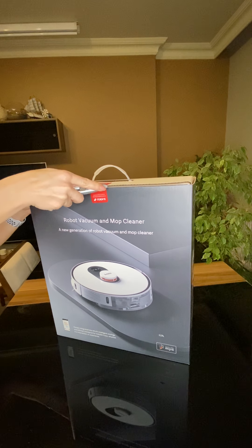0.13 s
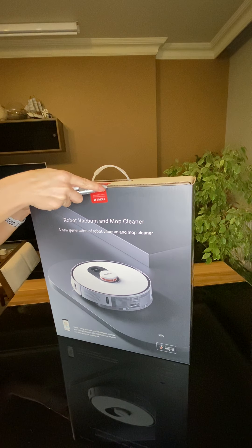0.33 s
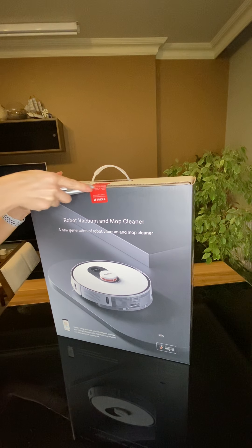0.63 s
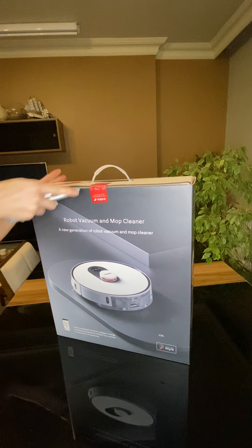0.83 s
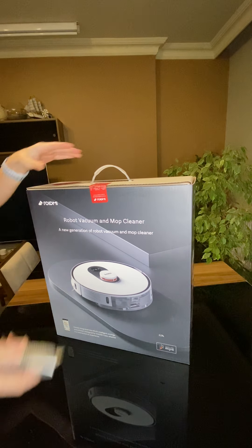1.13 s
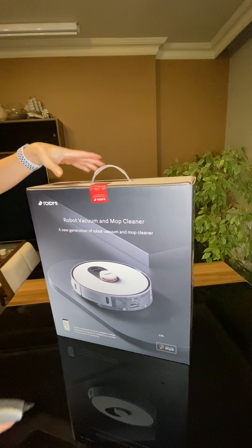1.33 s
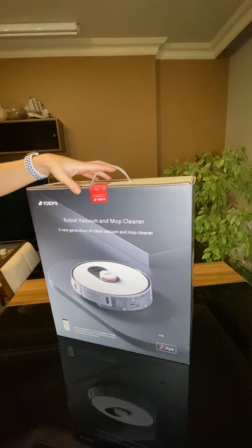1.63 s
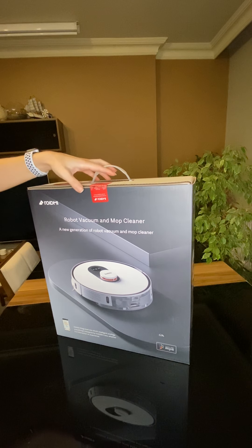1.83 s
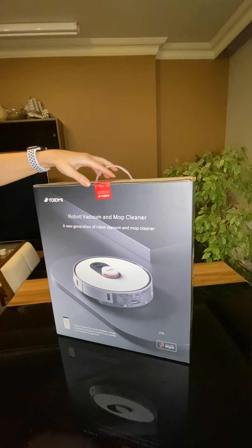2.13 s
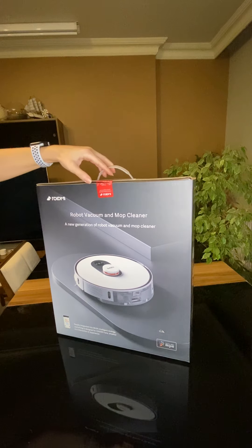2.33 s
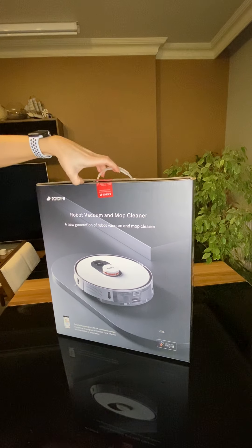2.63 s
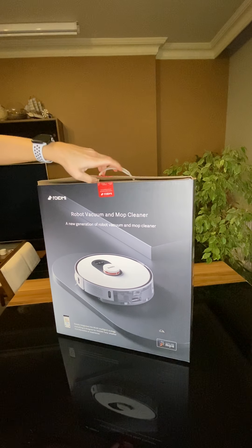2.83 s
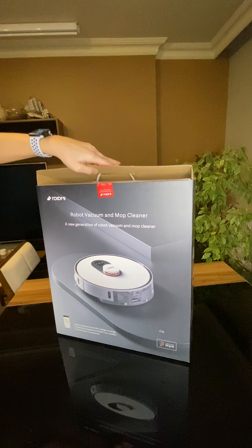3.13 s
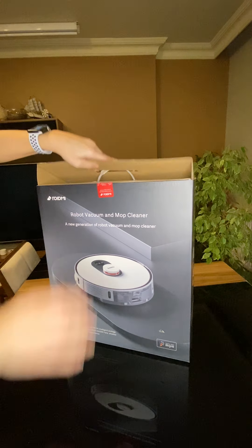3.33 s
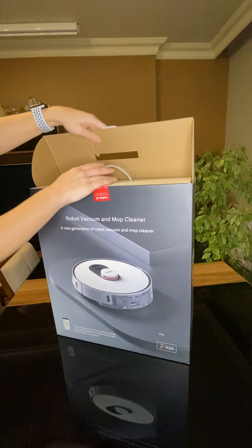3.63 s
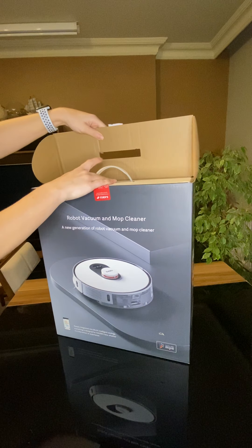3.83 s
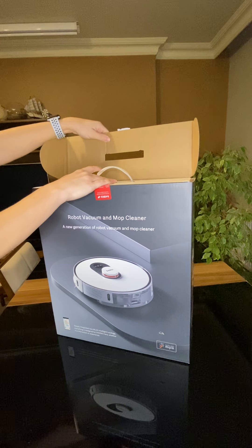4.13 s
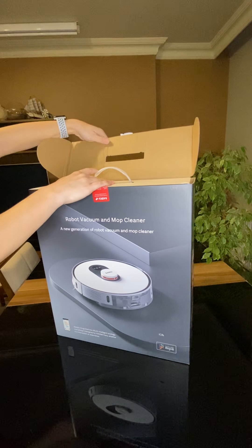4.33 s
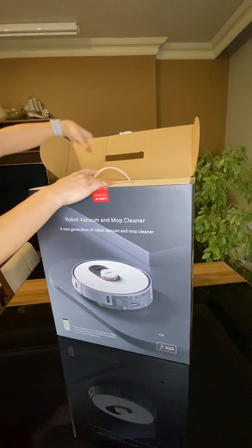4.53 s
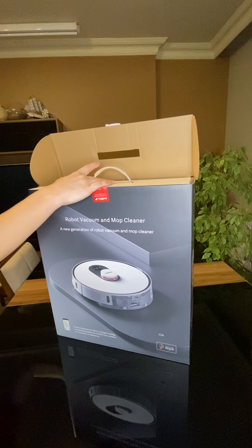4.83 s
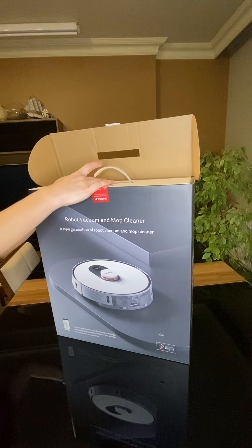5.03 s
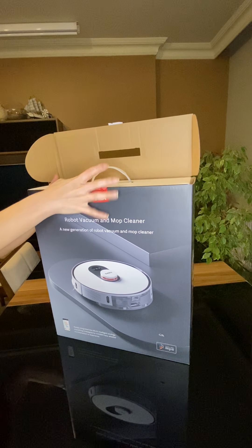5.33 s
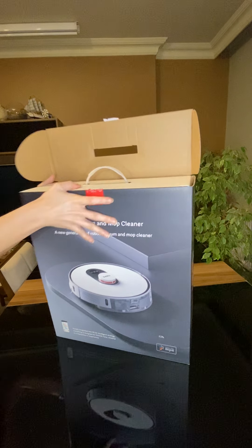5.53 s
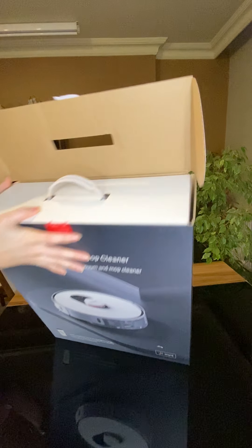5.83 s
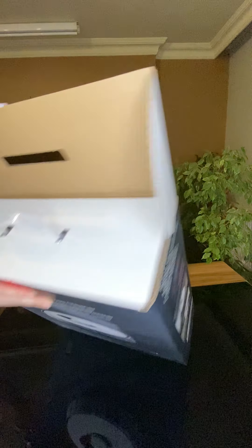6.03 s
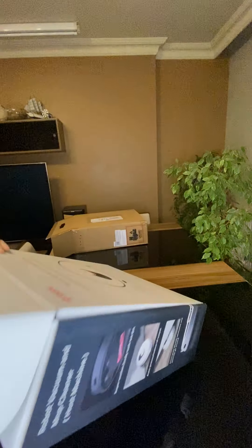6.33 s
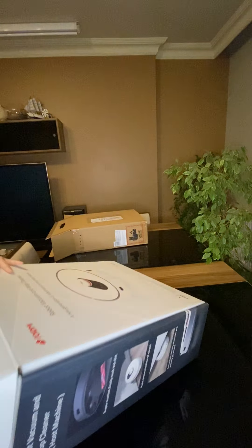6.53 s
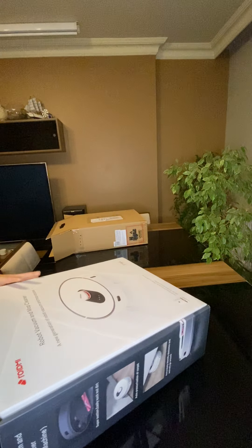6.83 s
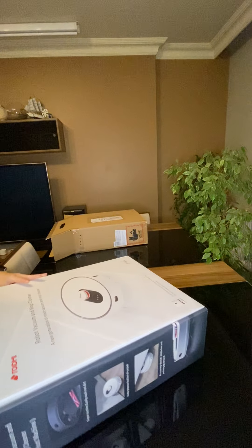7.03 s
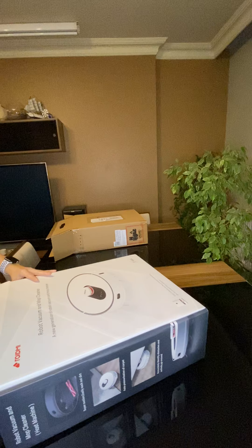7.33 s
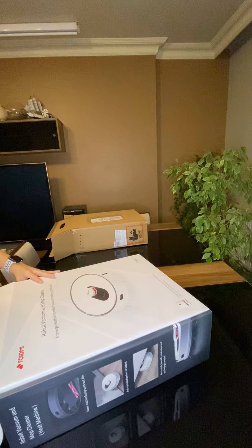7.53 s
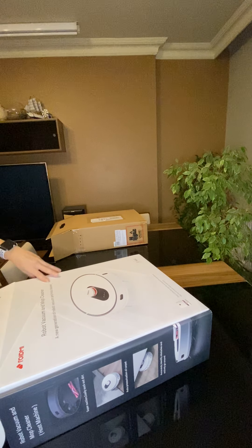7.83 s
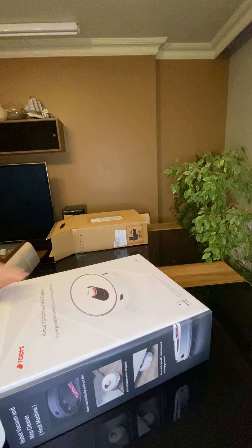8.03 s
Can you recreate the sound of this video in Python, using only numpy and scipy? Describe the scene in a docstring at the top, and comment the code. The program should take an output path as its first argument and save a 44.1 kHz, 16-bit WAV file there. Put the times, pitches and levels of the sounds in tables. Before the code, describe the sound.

A cardboard box is cut and pulled open with rasps, sharp snaps and hollow knocks, then rubs and slides on a table.

```python
"""In a quiet room, a large cardboard box rests on a hard table whose top rumbles under the load.
Hands cut the seal: stick-slip friction makes the card rasp, knocks ring the hollow box, fibres snap.
The plastic handle then ticks in its slot, and the box is pulled open with the loudest knocks and snaps.
Last, the flaps creak and slide as they are folded, and the box is laid down.
Sound and room echo reach a nearby phone with two microphone ports."""
import sys
import numpy as np
from scipy import signal
from scipy.fft import rfft, irfft
from scipy.io import wavfile
from scipy.ndimage import uniform_filter1d

SR = 44100
rng = np.random.default_rng(int(sys.argv[2]) if len(sys.argv) > 2 else 0)


def wav_record(signal):
    """Record a signal, one row per channel, as 16-bit PCM in the file named by sys.argv[1]."""
    frames = np.transpose(np.atleast_2d(signal))
    bounded = np.clip(frames, -1, 1)
    # unit amplitude maps onto the largest positive 16-bit level
    quanta = np.round(bounded * 32767).astype(np.int16)
    wavfile.write(sys.argv[1], SR, quanta)


N = 360738

# blows on the box: (time [s], panel level [dB], panel pitch [Hz], boom level [dB], crunch level [dB])
KNOCKS = [(0.496, -19.5, 446, -64, -33.5), (0.528, -14.5, 290, -24, -48), (0.68, -23, 432, -30.5, -34),
          (0.706, -22, 442, -34.5, -60), (2.152, -38, 730, -46, -80), (2.288, -28.5, 344, -45, -42.5),
          (2.493, -18, 355, -27.5, -33), (2.889, -10.5, 754, -41, -37), (2.903, -26, 790, -55, -39),
          (2.941, -18, 753, -50, -39), (3.05, -33.5, 350, -33.5, -48), (3.395, -26.5, 730, -31.5, -28),
          (3.425, -21, 546, -28, -17.5), (3.503, -8, 780, -30, -15), (3.514, -12, 400.5, -15.5, -19),
          (3.783, -31, 680, -55, -42), (3.894, -30.5, 446, -58, -41), (3.95, -28, 295, -40.5, -36),
          (4.033, -29.5, 405, -46, -43), (4.247, -29.5, 314, -51, -40.5), (4.273, -25.5, 297, -64, -37.5),
          (4.426, -29.5, 340, -36.5, -37), (4.47, -29.5, 340, -33.5, -56), (4.683, -35, 633, -87, -32.5),
          (4.8, -17, 650, -46, -35.5), (4.816, -17, 327, -22, -28), (4.9, -26.5, 590, -38, -38.5),
          (4.911, -21, 257, -24.5, -53), (4.988, -21.5, 319, -26.5, -42), (5.008, -27, 276, -28.5, -61),
          (5.046, -33, 770, -49, -40), (5.09, -35, 814, -53, -38), (5.215, -26.5, 580, -35.5, -59),
          (5.279, -28, 576, -34.5, -41), (5.375, -30, 463, -37, -39), (5.502, -36, 446, -40.5, -36.5),
          (5.655, -32, 393, -55, -47.5), (5.693, -29, 356, -50.5, -46), (5.746, -36.5, 430, -53.5, -54.5),
          (5.829, -37, 300, -36, -64.5), (5.943, -44, 850, -47.5, -44.5), (6.043, -36.5, 730, -69.5, -49.5),
          (6.188, -35, 920, -48, -57), (6.244, -35.5, 388, -44, -50), (6.425, -30.5, 415, -53, -57),
          (6.49, -35, 560, -40.5, -76), (6.512, -30.5, 407, -47.5, -56), (6.574, -31.5, 370, -49, -73),
          (6.734, -39.5, 1020, -45, -48), (6.751, -35, 790, -43, -54), (6.821, -31, 392, -59, -52),
          (7.063, -26.5, 493, -32.5, -36.5), (7.476, -17.5, 454, -25, -30.5),
          (7.766, -27.5, 523, -44.5, -66.5), (7.806, -33, 303, -40, -52), (7.822, -25.5, 717, -53, -54),
          (7.985, -38, 318, -52, -65)]
# treble resonances of the card's skin: (frequency [Hz], bandwidth [Hz], gain [dB])
SKIN_MODES = [(5100, 1200, 2.5), (7280, 720, 8), (8900, 5400, 2.5), (13200, 1700, -1.5)]


def undb(db):
    return 10 ** (np.asarray(db) / 20)


def unit_rms(x):
    return x / np.sqrt(np.mean(x ** 2))


def unit_peak(x):
    return x / np.abs(x).max()


def add(out, start_s, piece):
    i = int(start_s * SR)
    out[i:i + len(piece)] += piece[:N - i]


def band(x, lo_hz, hi_hz):
    return signal.lfilter(*signal.butter(2, [lo_hz, hi_hz], "band", fs=SR), x)


def by_time(table):
    """Linear interpolation of each level column, silent before the first row."""
    times, *columns = np.transpose(table)
    return [np.interp(np.arange(N) / SR, times, db, left=-120.) for db in columns]


def by_frequency(table):
    """Interpolation onto the spectrum's bins along a logarithmic frequency axis."""
    hz, value = np.transpose(table)
    bin_hz = np.arange(N // 2 + 1) * SR / N
    return np.interp(np.log(bin_hz + 1), np.log(hz + 1), value)


def resonate(x, modes):
    """Modal superposition: band-pass resonances alternate in sign so that the valleys stay filled."""
    return sum((-1) ** k * undb(db) * signal.lfilter(*signal.iirpeak(hz, hz / width, SR), x)
               for k, (hz, width, db) in enumerate(modes))


def wander(rate_hz):
    """Slow modulation: straight ramps between random values."""
    hold = int(SR / rate_hz)
    return uniform_filter1d(np.repeat(rng.standard_normal(N // hold + 1), hold), hold)[:N]


def room_tone():
    """Ambient air noise: long waves reach both ports alike, the middle range differs between them."""
    spectrum = [(30, -19.5), (102, 1), (125, -6), (301, -15.5), (428, -28.5), (473, -16), (510, -24.5),
                (672, -26), (12000, -65), (15600, -97.5), (22000, -120)]  # air noise: (frequency [Hz], relative spectral density [dB])
    mid, side = (irfft(rfft(rng.standard_normal(N)) * undb(by_frequency(spectrum)), N) for _ in range(2))
    air = mid + 1.9 * band(side, 400, 5600) * np.array([[1], [-1]])
    return unit_rms(air) * undb(-57.5 + 0.75 * wander(19.0))


def table_top():
    """Forced vibration: the weight on the table and every knock shake its lowest modes."""
    load = [(0, -60), (.4, -72), (1.0, -62), (2.4, -51), (3.3, -56), (4.1, -54), (4.85, -48.5), (5.1, -47),
            (5.6, -56), (6.5, -56), (6.77, -49), (6.9, -54), (8.18, -52.5)]  # rumble under the resting weight: (time [s], level [dB])
    jolt_db, rise_s, fade_s = -25, 0.067, 0.097  # level relative to the knock's boom
    drive = resonate(rng.standard_normal(N), [(55.0, 37, 0)])
    shake = resonate(drive, [(49.0, 8.5, -3.5), (60.55, 9.1, 4.5)])
    gain, t = undb(by_time(load)[0]), np.arange(SR) / SR
    jolt = (1 - np.exp(-t / rise_s)) * np.exp(-t / fade_s)
    for start, _, _, boom_db, _ in KNOCKS:
        add(gain, start, undb(boom_db + jolt_db) * jolt)
    return unit_rms(shake) * gain


def slips(per_second, spread_db):
    """Stick-slip release: impulses at random moments, a few larger than the rest, at unit RMS."""
    out = np.zeros(N)
    when, size, sign = rng.random((int(per_second * N / SR), 3)).T
    size_db = spread_db * np.minimum(-np.log(1 - size), 3.5)
    out[(when * N).astype(int)] = undb(size_db) * np.sign(sign - .5)
    return unit_rms(out)


def slide_gains():
    """Friction noise follows pressure: creak, scrape and hiss swell together and share the hand's jerks."""
    # hands resting and shifting on the box: (time [s], creak level [dB], scrape level [dB])
    handling = [(.4, -84, -100), (.62, -63, -72), (.95, -71.5, -70), (1.25, -74, -77), (1.5, -69.5, -74.5),
                (2.26, -61.5, -71), (2.72, -80, -101), (3.0, -47.5, -57.5), (3.3, -56.5, -62.5),
                (3.7, -60, -56), (4.21, -86, -83), (4.8, -55, -71.5), (5.5, -53.5, -70.5),
                (6.0, -54.5, -74), (7.25, -62, -68.5), (7.41, -58.5, -76.5), (7.7, -58.5, -70),
                (8.0, -62.5, -69.5), (8.1, -76.5, -105)]
    # card sliding on card or table: (time of hardest push [s], length [s], creak [dB], scrape [dB],
    # hiss [dB])
    slides = [(0.524, 0.13, -47, -66, -75), (0.763, 0.23, -56, -56, -56.5), (1.63, 0.24, -66, -76, -63),
              (2.55, 0.25, -46, -54, -55.5), (2.854, 0.18, -44, -51.5, -53.5),
              (3.153, 0.11, -39.5, -65, -56), (3.59, 0.34, -50, -58, -52), (3.842, 0.52, -43, -68, -56),
              (4.068, 0.34, -46, -74, -80.5), (4.444, 0.41, -65, -68.5, -52), (4.613, 0.32, -92, -64, -53),
              (5.303, 0.36, -48.5, -61, -51), (6.23, 0.64, -57.5, -57, -58),
              (6.705, 0.42, -53.5, -60.5, -63), (7.089, 0.27, -56, -61.5, -69),
              (7.847, 0.33, -52.5, -74.5, -60.5)]
    rise_share, ends_db = 0.42, -20  # share of the length before the push; level at both ends
    hiss_offset_db, jerk_db = -7.5, [2.2, 1.7, 1.8]
    creak_db, scrape_db = by_time(handling)
    gains = undb([creak_db, scrape_db, scrape_db + hiss_offset_db])
    for push, length, *levels_db in slides:
        t = np.arange(-int(length * SR), int(2 * length * SR)) / SR
        swell = undb(ends_db * np.maximum(-t / rise_share, t / (1 - rise_share)) / length)
        for gain, db in zip(gains, levels_db):
            add(gain, push + t[0], undb(db) * swell)
    judder = wander(22) + .6 * wander(90)
    return gains * undb(np.outer(jerk_db, judder))


def rasp_gains():
    """Transient friction: a flap dragged past an edge bites at once, swells or eases, then lets go."""
    # short hard rasps: (time [s], length [s], swell [dB], flap creak [dB], scrape [dB], hiss [dB],
    # squeak [dB])
    rasps = [(0.487, 0.042, 4.5, -44.5, -49.5, -50.5, -56), (0.689, 0.06, -17, -40.5, -48, -43, -56),
             (2.178, 0.034, -2.5, -59.5, -69, -63.5, -70), (2.3, 0.051, 8, -57, -65, -63, -70),
             (2.9, 0.076, -14, -31.5, -39, -59, -62), (3.141, 0.061, -1.5, -54, -51.5, -55, -78),
             (3.403, 0.089, 11.5, -30.5, -42.5, -50, -67), (4.242, 0.2, -11, -46.5, -62, -61, -72.5),
             (4.442, 0.017, -2.5, -39, -49.5, -56, -65), (4.676, 0.035, 1.5, -44, -45, -48.5, -48.5),
             (5.049, 0.059, 3.5, -51, -64, -55.5, -63), (5.526, 0.06, 9.5, -54, -67.5, -70.5, -65.5),
             (5.838, 0.04, -7.5, -52.5, -99.5, -105.5, -66.5), (6.15, 0.13, 1, -52, -83, -94, -63),
             (6.602, 0.088, 4.5, -81, -64, -98, -52.5), (7.131, 0.056, -8.5, -50, -62, -77, -53),
             (7.442, 0.11, -6, -40, -52, -68, -53), (7.731, 0.03, -3, -46, -60, -77, -61.5),
             (7.788, 0.072, -7, -42, -52.5, -61, -62)]
    bite_s, release_s = 0.0029, 0.0097
    gains = np.zeros((4, N))
    for start, length, swell_db, *levels_db in rasps:
        t = np.arange(int((length + 0.085) * SR)) / SR
        release = np.exp(-np.maximum(t - length, 0) / release_s)
        envelope = undb(swell_db * t / length) * np.minimum(t / bite_s, 1) * release
        for gain, db in zip(gains, levels_db):
            add(gain, start, undb(db) * envelope)
    return gains


def rubbing():
    """Stick-slip friction drives resonances: walls creak, edges scrape, skin hisses, print squeaks."""
    # resonances of walls, edges and glossy print: (frequency [Hz], bandwidth [Hz], gain [dB])
    wall_modes = [(126, 170, 2.5), (179.2, 53, 8), (250, 160, -2), (430, 97, -2.5), (622, 170, -4.5),
                  (750, 140, -6), (1220, 860, -18.5)]
    edge_modes = [(1510, 720, -3), (2380, 470, 2), (2867, 576, 4), (4250, 4000, -5.5)]
    squeak_modes = [(2303, 160, 0.69), (2920, 750, -1.7)]
    wander_db, rubbing_top_hz = 4.2, 12500
    grip = slips(260, 1.2) + .6 * rng.standard_normal(N)
    # slips catch the modes unevenly, so the colour of the rubbing shifts
    coupling = [undb(wander_db * wander(35)) for _ in wall_modes]

    def walls(x):
        return sum(resonate(x * share, [mode]) for share, mode in zip(coupling, wall_modes))

    def uneven(x, modes):
        return sum((-1) ** k * np.sqrt(coupling[k]) * resonate(x, [mode]) for k, mode in enumerate(modes))

    creak = band(walls(grip), 77, 1100)
    grit = slips(900, 2.2) + 0.86 * rng.standard_normal(N)
    scrape = uneven(grit, edge_modes)
    squeak = band(resonate(grit, squeak_modes), 1900, 3130)
    glide = 0.5 * slips(600, 3.2) + rng.standard_normal(N)
    hiss = band(uneven(glide, SKIN_MODES), 4400, 19000)
    flap = band(walls(grit), 280, 1500)  # a thin flap shakes only the smaller panels
    sliding = sum(unit_rms(x) * gain for x, gain in zip([creak, scrape, hiss], slide_gains()))
    rasping = sum(unit_rms(x) * gain for x, gain in zip([flap, scrape, hiss, squeak], rasp_gains()))
    return signal.sosfilt(signal.butter(6, rubbing_top_hz, fs=SR, output="sos"), sliding + rasping)


def knocks():
    """Impact excitation: a blow crunches the card and leaves panel and hollow box in damped vibration."""
    box_modes = [(59, -14, .3), (98, -11, .16), (128, -1, .55), (180, 1, .12), (221, -3, .11),
                 (262, -8, .15)]  # hollow box: (frequency [Hz], level [dB], time to fall 60 dB [s])
    panel_modes = [(0.702, -21, 0.011), (1.011, 1.76, 0.0033), (1.55, -7.5, 0.0035)]  # struck panel: (ratio to its pitch [1], level [dB], time constant [s])
    held_from_s, held_until_s, held_ring_share = 3.7, 7.3, .3  # gripping hands shorten the ring
    out, crunch, t = np.zeros(N), np.zeros(N), np.arange(int(.6 * SR)) / SR
    box_hz, box_db, t60 = np.transpose(box_modes)[:, :, None]
    ratio, panel_db, fade_s = np.transpose(panel_modes)[:, :, None]
    polarity = (-1) ** np.arange(len(box_modes))[:, None]  # neighbouring modes are opposed
    for start, level_db, pitch_hz, boom_db, crunch_db in KNOCKS:
        spot, detune = rng.standard_normal((2, len(box_modes), 1))  # each spot drives other modes
        panel_hz = pitch_hz * ratio * (1 + 0.2 * np.abs(ratio - 1) * rng.standard_normal(ratio.shape))
        panel = undb(panel_db) * np.sin(2 * np.pi * panel_hz * t) * np.exp(-t / fade_s)
        ring_s = t60 * (held_ring_share if held_from_s < start < held_until_s else 1)
        ring = np.sin(2 * np.pi * box_hz * (1 + 0.0054 * detune) * t) * 1000. ** (-t / ring_s)
        boom = polarity * undb(box_db + 1.3 * spot) * ring
        add(out, start, undb(level_db) * (1 - np.exp(-t / 0.001)) * panel.sum(axis=0))
        add(out, start, undb(boom_db) * (1 - np.exp(-t / 0.0009)) * boom.sum(axis=0))
        add(crunch, start, undb(crunch_db) * (1 - np.exp(-t / 0.0027)) * np.exp(-t / 0.0036))
    return out + undb(11.5) * band(crunch * rng.standard_normal(N), 1100, 2300)


def snaps():
    """Sudden release of strain: a bright burst from the card's skin, a pitched crack from its edge."""
    # tabs, tape and fibres giving way: (time [s], bright peak [dB], crack peak [dB], crack pitch [Hz])
    breaks = [(0.675, -25, -37, 2050), (0.6959, -26.5, -32.5, 4130), (0.904, -54, -48.5, 3620),
              (2.4892, -24, -22.5, 1900), (2.747, -45, -41.5, 2770), (2.8885, -7, -8.5, 2900),
              (3.0428, -52, -31, 2340), (3.3917, -32.5, -34.5, 2370), (3.426, -22.5, -27, 2220),
              (3.436, -24, -20, 2340), (3.468, -14, -15.5, 1970), (3.4885, -13, -13, 2180),
              (3.4955, -5, -31, 2190), (3.5025, -23, -12.5, 5400), (4.714, -25.5, -54, 2160),
              (4.8, -42, -46, 2460), (4.814, -39, -43, 1930), (4.914, -34, -41, 3570),
              (5.085, -36, -37, 3860), (5.2106, -27.5, -49, 2880), (5.248, -29.5, -39.5, 2840),
              (5.271, -22, -47, 3120), (5.309, -24.5, -34, 2900), (5.33, -35, -36, 4900),
              (5.3515, -29.5, -37.5, 1960), (5.943, -49.5, -36.5, 2690), (7.064, -52, -40, 2444),
              (7.4747, -44, -31.5, 2690)]
    out, t = np.zeros(N), np.arange(int(.05 * SR)) / SR
    envelope = (1 - np.exp(-(t / 0.0019) ** 2)) * (np.exp(-t / 0.0016) + 0.034 * np.exp(-t / 0.017))
    for start, bright_db, crack_db, crack_hz in breaks:
        skin_burst, edge_burst = envelope * rng.standard_normal((2, len(t)))
        bright = band(resonate(skin_burst, SKIN_MODES) + .09 * skin_burst, 4300, 13000)
        crack = resonate(edge_burst, [(crack_hz, 1000, 0)]) + 0.21 * band(edge_burst, 2900, 5400)
        add(out, start, undb(bright_db) * unit_peak(bright) + undb(crack_db) * unit_peak(crack))
    return out


def handle_ticks():
    """Modal ringing: a short scuff excites the stiff plastic handle, a little differently each time."""
    ticks = [(1.427, -47, -20), (1.4454, -37.5, -7), (1.456, -43, 5), (1.5126, -41.5, -5),
             (1.675, -32.5, 5), (1.679, -22.5, -3.5), (1.819, -48, -12), (1.829, -42, -11),
             (1.957, -10.5, 4)]  # the handle in its slot: (time [s], peak level [dB], relative treble [dB])
    handle_modes = [(754, 100, -9.5), (2260, 340, -7), (3110, 600, 0), (3740, 560, -7), (5050, 800, -6),
                    (7550, 1950, -5.5), (9430, 3600, -4.5)]  # plastic resonances: (frequency [Hz], bandwidth [Hz], level [dB])
    treble_above_hz = 4636
    out, t = np.zeros(N), np.arange(int(.05 * SR)) / SR
    envelope = (1 - np.exp(-(t / 0.0014) ** 2)) * np.exp(-t / 0.0022)
    for start, peak_db, treble_db in ticks:
        scuff = envelope * rng.standard_normal(len(t))
        ring = np.zeros(len(t))
        for hz, width, db in handle_modes:
            mode_db = db + 1.5 * rng.standard_normal() + treble_db * (hz > treble_above_hz)
            drive = resonate(scuff, [(hz, 2 * width, 0)])
            ring += undb(mode_db) * unit_rms(resonate(drive, [(hz, width, 0)]))
        add(out, start, undb(peak_db) * unit_peak(ring))
    return out


def echoes(x):
    """Reverberation: walls and furniture return a diffuse tail whose treble dies sooner."""
    low_t60_s, high_t60_s = 0.46, 0.26
    t = np.arange(int(.6 * SR)) / SR
    onset = 1 - np.exp(-(t / 0.003) ** 2)
    low, mid, side = rng.standard_normal((3, len(t))) * onset
    side = band(band(side, 330, 10000), 330, 8700) * np.array([[1], [-1]])  # opposed at the two ports
    low = low * 1000. ** (-t / low_t60_s)
    high = (mid + 1.8 * side) * 1000. ** (-t / high_t60_s)
    low = band(low / np.linalg.norm(low), 170, 480)
    high = band(high / np.linalg.norm(high[0]), 410, 12000)
    return signal.fftconvolve(x[None], undb(-4) * low + undb(-9) * high, axes=1)[:, :N]


def ports(x):
    """Diffraction: the phone's body delays and shades sound differently at its two ports."""
    balance = [(200, 0.5), (380, 2.0), (700, 3.0), (1290, 1.5), (2380, -1.0), (4400, -2.0), (8120, 1.0),
               (15000, 0.0)]  # shading: (frequency [Hz], left minus right level [dB])
    lead = [(0, 0), (520, -.2), (1550, 0), (3450, 1.3), (3960, .5), (4740, 2.7), (5080, 5.6), (5340, 6.5),
            (7320, 7.1), (8010, 7.9), (9470, 7.9), (11200, 8.8), (16000, 8.9)]  # delay: (frequency [Hz], phase lead of the left port [rad])
    half = undb(by_frequency(balance) / 2) * np.exp(.5j * by_frequency(lead))
    return irfft(rfft(x) * np.array([half, 1 / half]), N)


def scene():
    """Superposition: the box, its echoes, the table and the air add up at the two ports."""
    box = knocks() + snaps() + handle_ticks() + rubbing()
    return ports(box + echoes(box) + table_top() + room_tone())


def record(dry):
    """Band limiting: the phone drops the deepest bass and cuts the top."""
    bottom_hz, top_hz = 40, 15800
    dry = signal.sosfilt(signal.butter(4, bottom_hz, "high", fs=SR, output="sos"), dry)
    return signal.sosfilt(signal.ellip(8, .2, 80, top_hz, fs=SR, output="sos"), dry)


dry = scene()
out = record(dry)
wav_record(out)
```